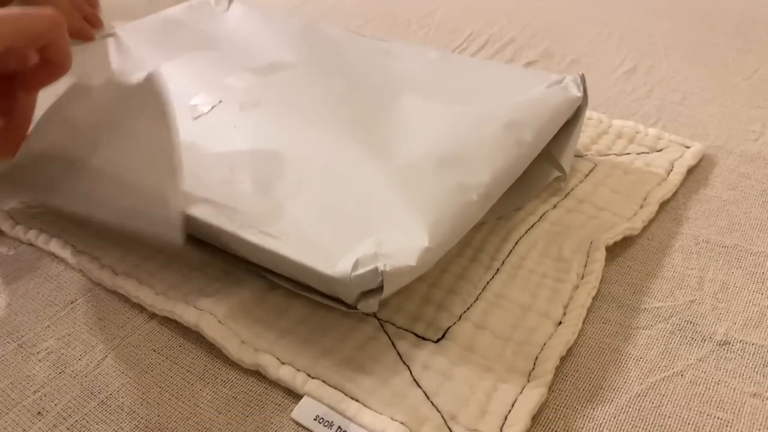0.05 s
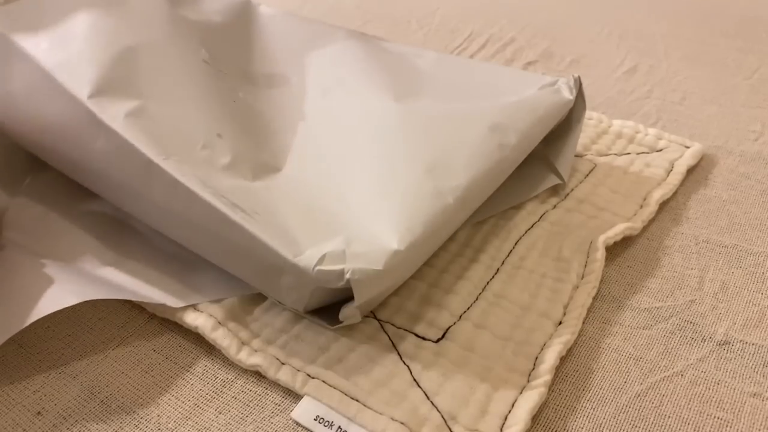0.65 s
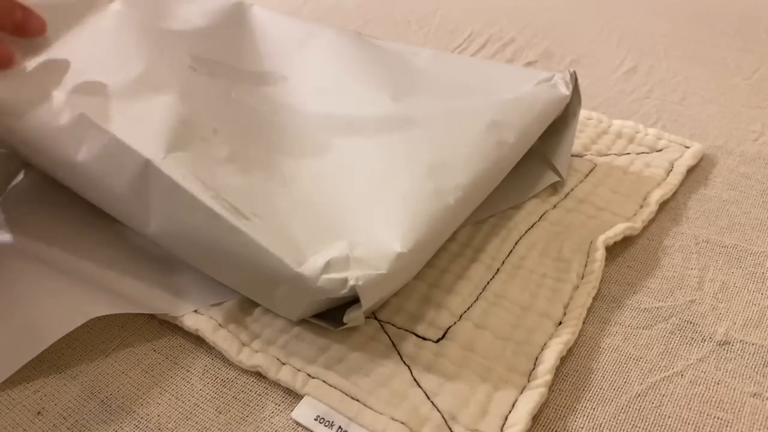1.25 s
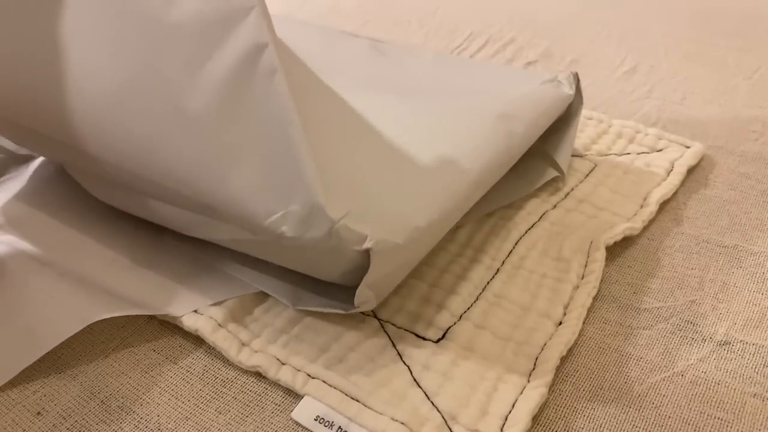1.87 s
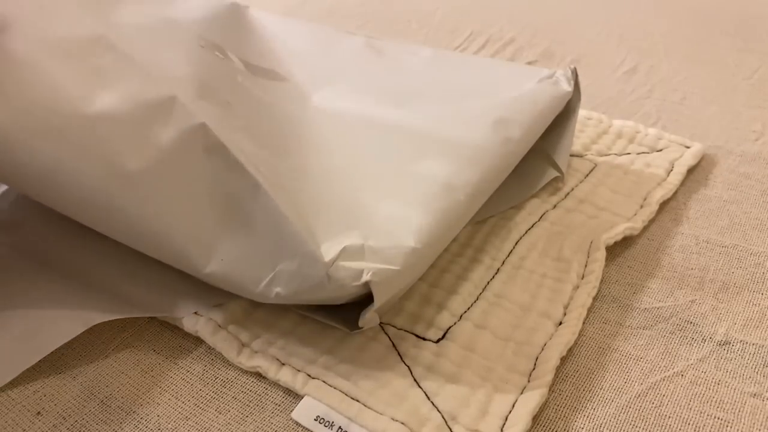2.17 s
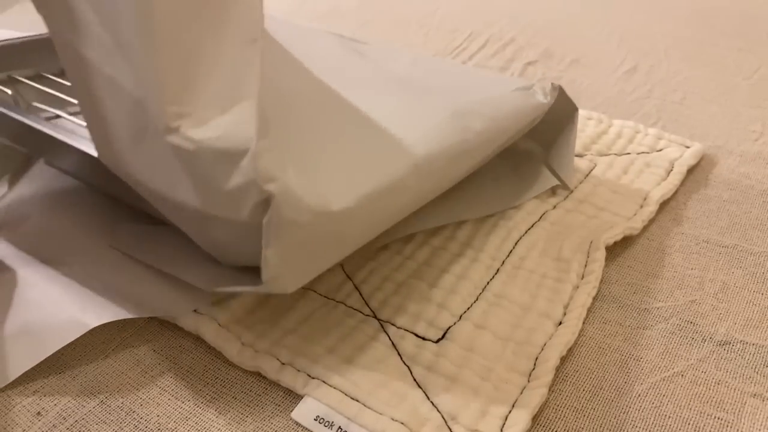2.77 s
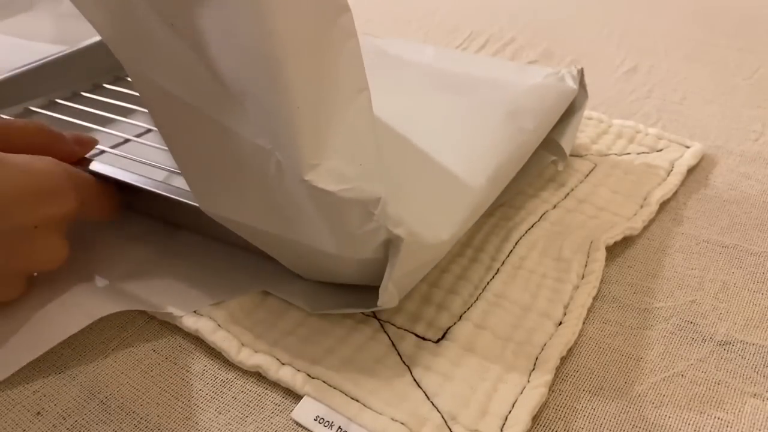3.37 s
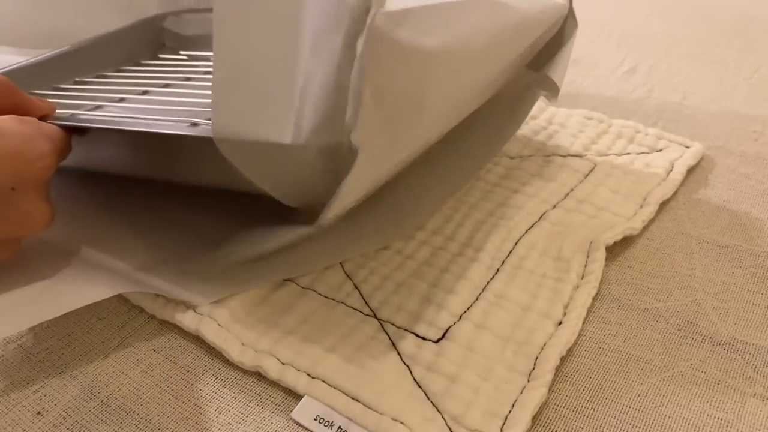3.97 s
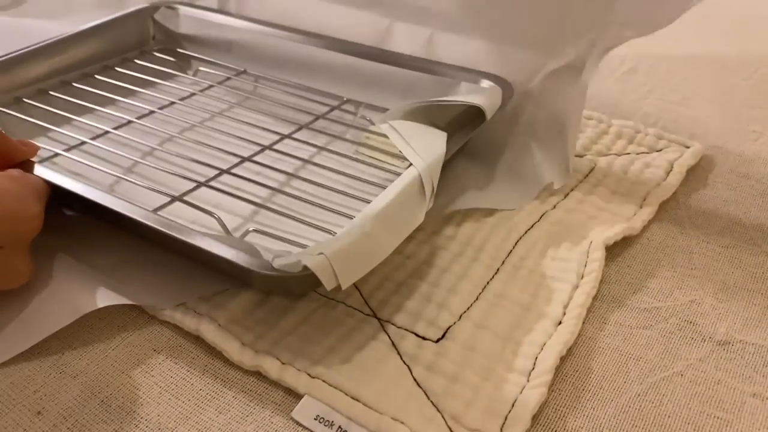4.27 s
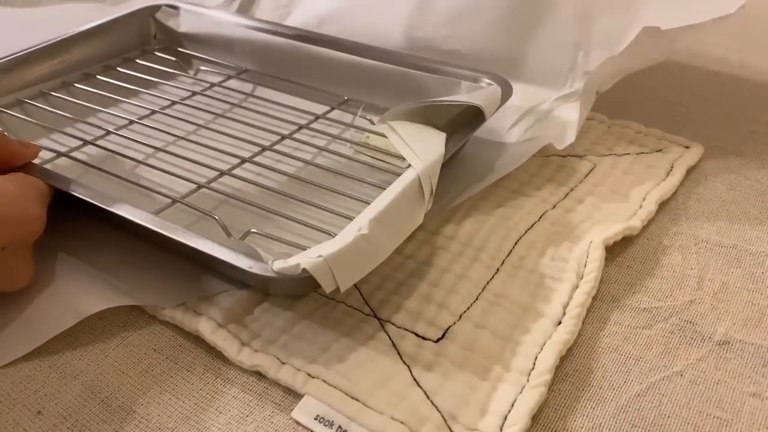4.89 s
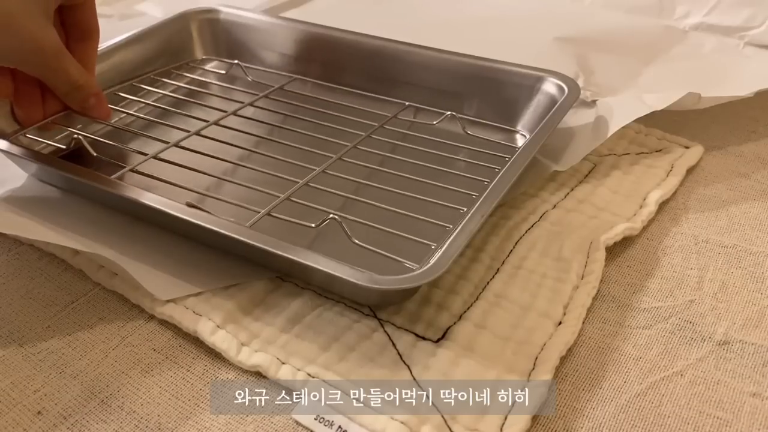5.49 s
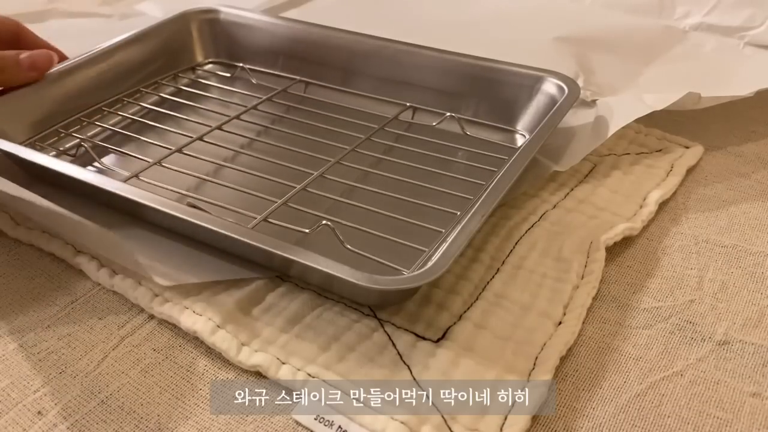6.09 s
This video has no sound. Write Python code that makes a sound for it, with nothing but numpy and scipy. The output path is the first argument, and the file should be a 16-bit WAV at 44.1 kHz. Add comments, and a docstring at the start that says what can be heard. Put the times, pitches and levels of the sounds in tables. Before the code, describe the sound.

From the start, hands pull stiff wrapping paper off a steel tray, close to the microphone in a small room with a faint low hum. The sheet slides and crackles in repeated pulls, full of sharp crease snaps and hollow pops as it buckles around the tray, busiest around 1.2 to 1.7 seconds. The tray bumps softly on a cloth-covered table at about 0.8, 1.4, 2.4 and 3.1 seconds. Near 4 seconds the rustle swells and the tray comes free with the hardest muffled thud. The paper crackles more loosely and settles by 5 seconds. From about 5.2 seconds a wire rack scrapes lightly in the tray, ticks once, and drops into place near 5.6 seconds with a short, bright, ringing clatter. One last small paper crackle comes just after 6 seconds.

```python
"""Over the low hum of a small room, close by, hands pull stiff wrapping paper off a steel tray.
Pull after pull the sheet slides and crackles, creases snap and panels buckle, hollow while the tray
is still inside. The tray bumps the cloth-covered table, hardest as it comes free at about 4 s.
The paper settles; the tray's wire rack slides and, near 5.6 s, drops into place with a short
ringing clatter. One last small crackle of paper follows."""
import sys
import numpy as np
from scipy import signal
from scipy.fft import rfft, irfft
from scipy.io import wavfile

SR = 44100
rng = np.random.default_rng(int(sys.argv[2]) if len(sys.argv) > 2 else 0)


def inscribe(sig):
    """Save sig as 16-bit PCM at rate SR to the path in sys.argv[1].

    A 1-D sig is mono; a 2-D sig holds one channel per row.
    Samples are clipped to [-1, 1] before scaling.
    """
    pcm = np.round(np.clip(np.atleast_2d(sig).T, -1, 1) * 32767)
    wavfile.write(sys.argv[1], SR, pcm.astype(np.int16))


N = 270774
T = np.arange(N) / SR


def undb(db):
    """Decibels to gain."""
    return 10 ** (np.asarray(db) / 20)


def unit(x):
    """Scale to rms 1."""
    return x / np.sqrt(np.mean(x ** 2))


def on_bins(points, size):
    """Read a (Hz, value) curve at the bins of a transform."""
    hz, value = np.transpose(points)
    return np.interp(np.log(np.arange(size // 2 + 1) * SR / size + 1), np.log(hz + 1), value)


def colour(x, points, size=4096):
    """Minimum-phase EQ along a (Hz, dB) curve, with unit power gain."""
    cepstrum = irfft(np.log(undb(on_bins(points, size))))
    causal = np.r_[1, np.full(size // 2 - 1, 2), np.zeros(size // 2)]
    response = irfft(np.exp(rfft(cepstrum * causal)))
    return signal.fftconvolve(x, response[None] / np.linalg.norm(response), axes=-1)[:, :N]


def add(track, s, sound):
    """Mix a short sound in at time s."""
    start = max(int(s * SR), 0)
    track[:, start:start + sound.shape[1]] += sound[:, :N - start]


def fade(t, t60):
    """Exponential decay, 60 dB down at t60."""
    return np.exp(-np.log(1000) * t / t60)


def walk(rate):
    """Random wander with a spread near 1, turning rate times a second."""
    return np.interp(T * rate, np.arange(N), rng.standard_normal(N))


def grains(rate, spread_db):
    """Two trains of tiny clicks; a positive spread makes a few stand out, a negative one sinks a few."""
    size = undb(spread_db * np.minimum(rng.exponential(size=(2, N)), 3.5))
    fires = rng.random((2, N)) < rate / SR
    return unit(fires * size * rng.choice([-1, 1], (2, N)))


# spectrum of the background bed: (frequency [Hz], level [dB])
HUM_EQ = [(15, -16), (25, -6), (75, 2.5), (100, -5), (122, 5), (160, -9), (373, -8), (709, -22),
          (1280, -20), (1910, -46.5), (2370, -23), (2780, -70.5), (3440, -68.5), (10000, -61),
          (13100, -60.5), (15000, -52.5)]

def room_tone():
    """A faint low hum of the house, gently wavering."""
    return colour(rng.standard_normal((2, N)), HUM_EQ) * undb(-55 + walk(rate=8.1))


# hand gestures: (start [s], length [s], opening level [dB], closing level [dB], extra slide [dB])
PULL_CUES = [(0.024, 0.25, -33.5, -60.5, 1.5), (0.275, 0.06, -49, -45, -12.5), (0.354, 0.22, -56, -39, 7.5),
             (0.683, 0.11, -46.5, -40.5, 3.5), (0.903, 0.14, -56, -45, -2.5),
             (1.19, .19, -45.5, -30.5, -2.5), (1.4, 0.17, -40, -44.5, 4), (1.539, 0.11, -38.5, -46.5, 7),
             (1.648, 0.021, -39, -36.5, 0), (1.745, 0.055, -60, -48.5, -3), (1.922, 0.25, -50, -44.5, 1),
             (2.215, 0.083, -47.5, -66, 5.5), (2.306, 0.028, -45.5, -37.5, 1),
             (2.385, 0.34, -43, -38.5, -0.5), (2.803, 0.21, -55.5, -46, 1), (3.048, .1, -51, -49, -0.5),
             (3.351, 0.24, -51, -66.5, -6.5), (3.466, 0.37, -47, -42.5, 2), (3.874, 0.13, -52.5, -33.5, 5),
             (3.969, 0.085, -34, -32, 1), (4.087, 0.279, -43, -39.5, -7.5), (4.4, 0.096, -40, -45.5, 2),
             (4.503, 0.35, -46, -64, -17), (4.88, .075, -44.5, -59, -3.5), (5.061, 0.024, -59.5, -64.5, -3),
             (6.066, 0.06, -51, -64.5, 5.5)]

def pulls(grip_db_per_s=1001, release_db_per_s=282, held_db=-64.5, let_go_s=4.95, waver_db=1.65):
    """Effort and slide envelopes in dB: each pull grips fast, swells or eases, and releases slower."""
    effort = slide = held_db - release_db_per_s * np.maximum(T - let_go_s, 0)  # the held sheet rubs
    depth_db = 60
    for s, length, first_db, last_db, slide_db in PULL_CUES:
        times = [s - depth_db / grip_db_per_s, s, s + length, s + length + depth_db / release_db_per_s]
        db = np.interp(T, times, [first_db - depth_db, first_db, last_db, last_db - depth_db])
        effort = np.maximum(effort, db)
        slide = np.maximum(slide, db + slide_db)
    return effort + waver_db * walk(rate=28), slide


# friction hiss, its airy top, crumpling folds, flapping panels, table rumble:
# (frequency [Hz], level [dB])
HISS_EQ = [(500, -18.5), (1200, -1), (2000, -8), (3500, 2.5), (5000, 1), (7000, -1.5), (9000, -1),
           (12000, -5), (16000, -14.5)]
SHEEN_EQ = [(3000, -29.5), (6000, -8.5), (9000, 0), (12000, -1.5), (16000, -10.5)]
CRUMPLE_EQ = [(400, -22.5), (1000, -4), (1500, 2), (2500, 5), (3500, -9.5), (6000, -40), (14000, -37.5)]
PANEL_EQ = [(120, -8.5), (280, -7.5), (500, -0.5), (750, 4), (1050, -1), (1280, 2), (1800, -12.5),
            (3500, -20), (8000, -32.5)]
RUMBLE_EQ = [(20, -22), (45, -3.5), (75, 3.5), (130, -0.5), (250, -2), (450, -7.5), (1200, -50.5)]

def sliding_sheet(effort_db, slide_db):
    """Paper fibres catch and slip, folds crumple, and coarser slips shake the panels and the table."""
    drive_db = effort_db + 42  # 0 at a moderate pull
    catching = walk(rate=170)  # the sheet advances in tiny jerks
    hiss = colour(grains(rate=9000, spread_db=4) * undb(slide_db - 1 + 2 * catching), HISS_EQ)
    sheen_db = -47 + 1.66 * (slide_db + 40.5)  # a faster slide is brighter
    sheen = colour(grains(rate=4400, spread_db=-4) * undb(sheen_db), SHEEN_EQ)
    fine_wrinkles = grains(rate=2500, spread_db=2) * undb(1.9 * catching)
    single_wrinkles = undb(-3) * grains(rate=220, spread_db=2)
    crumple = colour((fine_wrinkles + single_wrinkles) * undb(-51 + 1.01 * drive_db), CRUMPLE_EQ)
    flutter_db = -44.5 + 0.86 * drive_db + 1.4 * catching
    flutter = colour(grains(rate=900, spread_db=4) * undb(flutter_db), PANEL_EQ)
    rumble = colour(grains(rate=630, spread_db=3) * undb(-48.5 + 0.66 * drive_db), RUMBLE_EQ)
    return hiss + sheen + crumple + flutter + rumble


# how much of the tray the wrapping encloses: (time [s], share [0-1])
ENCLOSED = [(0, .5), (1.2, 1), (2.8, 1), (3.6, .3), (4.1, 0)]
# air resonances inside the wrapping: (frequency [Hz], bandwidth [Hz], level [dB])
CAVITY_MODES = [(710, 150, -5.5), (960, 68, -3), (1350, 110, -10.5)]

def hollow_packet(paper):
    """The air between wrapping and tray gives the rustle a hollow ring until the tray is out."""
    trapped = paper * np.interp(T, *np.transpose(ENCLOSED))
    return paper + sum(undb(db - 5) * signal.lfilter(*signal.iirpeak(hz, hz / width, fs=SR), trapped)
                       for hz, width, db in CAVITY_MODES)


def small_snaps(effort_db, per_s=22, above_pull_db=3.5, scatter_db=10, taut_hz=5000, loose_hz=2600):
    """Cues (s, dB, Hz) for chance creases: they ride the pull and dull as the paper hangs loose."""
    jitter, strength, pitch = rng.random((400, 3)).T
    s = (np.arange(len(jitter)) + jitter) / per_s
    db = np.interp(s, T, effort_db) + above_pull_db + scatter_db * (2 * strength - 1)
    tautness = np.interp(s, *np.transpose(ENCLOSED))
    hz = (loose_hz + (taut_hz - loose_hz) * tautness) * 2 ** (pitch - .5)
    return list(np.transpose([s, db, hz])[s < T[-1]])


# featured crease snaps: (time [s], level [dB], band centre [Hz])
SNAP_CUES = [(0.0295, -14.5, 7400), (0.0385, -30, 4660), (0.0674, -18, 7000), (0.0723, -22, 5000),
             (0.1611, -20.5, 6640), (0.3234, -27, 4920), (0.3726, -18, 5740), (0.5343, -28.5, 3340),
             (0.5819, -20.5, 5600), (0.5939, -16.5, 5270), (0.6064, -28, 4800), (0.7858, -13.5, 5700),
             (0.9117, -33.5, 5870), (0.9279, -34, 5170), (0.9677, -23, 6960), (1.036, -24.5, 6150),
             (1.0495, -30, 6000), (1.0589, -27.5, 4140), (1.1857, -38.5, 3300), (1.2441, -18.5, 5760),
             (1.3184, -16.5, 6240), (1.3595, -13.5, 7130), (1.3678, -13, 7550), (1.4378, -14, 6000),
             (1.4451, -28, 5400), (1.5955, -12.5, 5900), (1.6521, -20.5, 6000), (1.6788, -47, 3830),
             (1.6909, -21, 5200), (1.775, -31, 6400), (2.0, -28, 3800), (2.0805, -44, 1700),
             (2.1187, -20, 6100), (2.2662, -43.5, 2070), (2.4332, -25.5, 4270), (2.4403, -14, 7500),
             (2.5842, -22, 6900), (2.6793, -22.5, 7150), (2.7305, -18.5, 7350), (2.9305, -27, 5930),
             (2.9946, -23, 5900), (3.1428, -34, 3160), (3.1532, -26.5, 5170), (3.3512, -45.5, 2300),
             (3.557, -29, 1620), (3.6395, -25.5, 4200), (3.7842, -20.5, 7860), (3.9806, -22.5, 4400),
             (4.0195, -19, 3600), (4.0946, -24, 3570), (4.1862, -25.5, 4750), (4.2099, -30, 4230),
             (4.2724, -35, 2944), (4.28, -28.5, 6040), (4.3237, -29, 3600), (4.3911, -23, 3580),
             (4.4034, -26, 5000), (4.4173, -35, 5000), (4.5369, -32, 3770), (4.5974, -35, 2600),
             (4.7228, -40.5, 2700), (4.761, -44.5, 2070), (4.8735, -36, 3100), (5.062, -44, 1996),
             (5.082, -57, 2950), (6.0625, -35.5, 3960), (6.073, -37, 4800)]

def creases(small_cues, rise_s=0.00081, flip_s=0.0012, trail_t60=0.041, q=0.63):
    """A crease flips in a millisecond or two, trails off in finer cracks and nudges its panel."""
    snaps, nudges = np.zeros((2, N)), np.zeros((2, N))
    t = np.arange(-256, 2048) / SR  # the snap peaks at t = 0
    edge_ratio = 1 + .5 / q
    for s, db, hz in list(SNAP_CUES) + small_cues:
        slow = (6000 / hz) ** 0.38  # a slack, dull fold flips more slowly than a taut one
        flip = np.exp(-(t / np.where(t < 0, rise_s, flip_s * slow)) ** 2)
        trail = undb(-16) * (t > 0) * fade(abs(t), trail_t60 * slow)
        burst = rng.standard_normal((2, len(t))) * (flip + trail)
        band_hz = [hz / edge_ratio, min(hz * edge_ratio, SR * .45)]
        snap = signal.lfilter(*signal.butter(2, band_hz, "band", fs=SR), burst)
        snap /= np.linalg.norm(snap, axis=1, keepdims=True)
        add(snaps, s + t[0], undb(db + 19.5) * np.sqrt(slow) * snap)
        add(nudges, s + t[0], undb(db - 9) * burst)
    snap_eq = [(300, 9.5), (1500, 10.5), (3500, 2), (6500, -2.5), (9500, 1), (16000, -0.5)]
    return colour(snaps, snap_eq) + colour(nudges, PANEL_EQ)


# whole panels giving way: (time [s], pop level [dB], pop pitch [Hz], crackle level [dB])
BUCKLE_CUES = [(0.036, -18.5, 670, -17.5), (0.071, -20, 605, -26), (0.135, -25, 480, -34),
               (0.579, -18.5, 716, -15), (0.596, -21, 755, -24), (0.786, -20, 624, -21.5),
               (0.798, -20, 610, -38.5), (0.914, -29.5, 560, -42.5), (1.036, -30, 690, -31),
               (1.057, -23, 794, -28.5), (1.243, -27.5, 1220, -38.5), (1.366, -20.5, 730, -22),
               (1.441, -21, 923, -39), (1.595, -22.5, 1220, -41.5), (1.677, -18.5, 890, -17.5),
               (1.69, -25.5, 590, -38), (1.937, -32.5, 736, -54), (2.079, -28.5, 727, -48),
               (2.135, -23.5, 970, -24.5), (2.436, -21.5, 400, -22), (2.484, -25, 680, -27.5),
               (2.659, -22.5, 668, -29), (2.729, -23.5, 670, -32), (3.018, -27.5, 350, -53),
               (3.141, -31, 340, -48), (3.555, -22.5, 693, -47), (3.638, -25.5, 500, -29),
               (3.786, -21.5, 490, -28), (4.009, -27.5, 680, -44), (4.092, -16.5, 597, -25),
               (4.873, -46, 727, -51), (6.047, -42.5, 960, -37)]

def buckling(pop_t60=0.049, crackle_t60=0.038, rise_s=0.0027, q=1.8):
    """A panel gives way: a hollow pop pitched by its size and a quick avalanche of small cracks."""
    pops, crackle_envelope = np.zeros((2, N)), np.zeros((1, N))
    t = np.arange(SR // 4)[None] / SR
    attack = np.minimum(t / rise_s, 1)
    for s, pop_db, hz, crackle_db in BUCKLE_CUES:
        hollow = signal.lfilter(*signal.iirpeak(hz, q, fs=SR), rng.standard_normal((2, t.size)))
        add(pops, s, undb(pop_db - 3) * unit(hollow) * attack * fade(t, pop_t60))
        add(crackle_envelope, s, undb(crackle_db) * attack * fade(t, crackle_t60))
    return pops + undb(2.5) * colour(crackle_envelope * grains(rate=4500, spread_db=-6.5), HISS_EQ)


def shivering(effort_db, below_pop_db=12, settle_db_per_s=263):
    """Each buckle shakes the whole sheet: the effort envelope kicks up, then settles."""
    shaken_db = effort_db.copy()
    for s, pop_db, _, _ in BUCKLE_CUES:
        after = slice(int(s * SR), int(s * SR) + SR // 2)
        shiver_db = pop_db - below_pop_db - settle_db_per_s * (T[after] - s)
        shaken_db[after] = np.maximum(shaken_db[after], shiver_db)
    return shaken_db


# thuds of the tray on the padded table: (time [s], level [dB], pitch [Hz])
BUMP_CUES = [(0.039, -39, 114), (0.799, -33, 119.2), (1.372, -26, 115), (2.434, -30, 186),
             (3.142, -33.5, 332), (3.148, -38, 158), (4.012, -31, 112), (4.025, -31.5, 62),
             (4.096, -29, 210), (4.1, -20, 122), (4.1156, -22.5, 124)]

def tray_bumps(t60=0.047, rise_s=0.0022):
    """The cloth softens each bump to a few low cycles of the table top."""
    thuds = np.zeros((2, N))
    t = np.arange(SR // 3)[None] / SR
    envelope = (1 - np.exp(-t / rise_s)) * fade(t, t60)
    for s, db, hz in BUMP_CUES:
        add(thuds, s, undb(db + 8) * np.sin(2 * np.pi * hz * t) * envelope)
    return thuds


# the rack's scrape before and after the drop: (time [s], level [dB])
SCRAPE_ENVELOPE = [(5.1, -68), (5.22, -51), (5.45, -52), (5.53, -54), (5.62, -39.5), (5.65, -33.5),
                   (5.7, -56.5), (6.03, -52.5)]
# hits of the rack on the tray: (time [s], level [dB], time to fall 30 dB [s])
CLINK_CUES = [(5.447, -18, 0.0081), (5.64, -9.5, 0.027), (5.651, -1.5, 0.038), (5.668, -4, 0.033),
              (5.707, -14, 0.072)]
# bright ring of the rack's frame: (frequency [Hz], level [dB], t60 [s])
FRAME_MODES = [(2000, -8, 0.22), (2575, -1.5, .18), (2895, -4, 0.18), (3084, -6, 0.206), (3170, -0.5, 0.23),
               (3840, -10.5, 0.39), (4735, 2, 0.1), (5120, 4, 0.203), (5340, -1, 0.19), (6315, -10, 0.4),
               (7140, -14, 0.14), (8850, 5, .16), (9800, -9, .16), (9959, -16, .2), (11100, -13, .12)]
# long ring of the tray's rim: (frequency [Hz], level [dB])
RIM_MODES = [(974, -1), (1136, -12), (1195, -5), (1297, 0), (1486, -14), (1680, -11.5), (2218, -4),
             (3246, -13), (3962, -13), (4215, -2), (5970, -10)]

def wire_rack(tray_t60=0.91, wires_t60=0.15):
    """Steel chatters on steel, ringing the rack's frame, a haze of wire modes and the tray."""
    t = np.arange(SR) / SR

    def ring(hz, t60):
        return np.sin(2 * np.pi * (hz * t + rng.random())) * fade(t, t60)

    def excite(push, body):
        return signal.fftconvolve(push, body[None] / np.sqrt(SR), axes=-1)[:, :N]

    force = undb(np.interp(T, *np.transpose(SCRAPE_ENVELOPE), left=-120, right=-120))
    soft_contact_eq = [(500, 3), (1400, -0.5), (3000, -8.5), (5000, -13), (12000, -16.5)]
    scrape = colour(force * grains(rate=130, spread_db=3), soft_contact_eq)
    blows = np.zeros((1, N))
    for s, db, length in CLINK_CUES:
        add(blows, s, undb(db) * fade(t, 2 * length)[None])
    chatter = blows * grains(rate=5000, spread_db=-2)
    frame = unit(sum(undb(db) * ring(hz, t60) for hz, db, t60 in FRAME_MODES))
    wires = unit(sum(ring(450 + 15000 * place ** 1.3, wires_t60 * undb(3.9 * (sustain - 1.5)))
                     for place, sustain in rng.random((320, 2))))
    rim = unit(sum(undb(db) * ring(hz, tray_t60) for hz, db in RIM_MODES))
    tray_bottom = unit(sum(ring(hz, tray_t60) for hz in rng.triangular(900, 1250, 1900, size=40)))
    rack_ring = undb(-1) * excite(chatter + undb(6) * scrape, wires + frame / 2)
    tray_ring = excite(undb(-20.5) * chatter + undb(-8) * scrape, tray_bottom + rim / 2)
    steel_eq = [(150, 4.5), (400, -5.5), (600, -3.5), (850, -0.5), (1300, 3.5), (2000, 1), (3000, 4),
                (5000, -1.5), (7000, 1.5), (10000, 3), (16000, -12)]
    return undb(-20.5) * colour(rack_ring + tray_ring + undb(-11) * chatter, steel_eq)


# stereo width: (frequency [Hz], side minus mid [dB])
WIDTH_CURVE = [(100, -19.5), (300, -28), (800, 2), (2500, 0.5), (6000, -5), (9000, -11.5)]

def widen(pair):
    """Two unrelated signals become mid and side of an image that is widest in the midrange."""
    side_gain = undb(on_bins(WIDTH_CURVE, N))
    gains = np.array([np.ones_like(side_gain), side_gain]) / np.sqrt(1 + side_gain ** 2)
    mid, side = irfft(rfft(pair) * gains, N)
    return np.array([mid + side, mid - side])


def room(x, t60=0.25, wet_db=-12, predelay_s=0.0022):
    """Table and walls return a short tail, duller than the direct sound."""
    t = np.arange(SR // 2) / SR
    tail = rng.standard_normal((2, len(t))) * fade(t, t60) * (t > predelay_s)
    tail /= np.linalg.norm(tail, axis=1, keepdims=True)
    wet = signal.fftconvolve(x, tail, axes=-1)[:, :N]
    return x + undb(wet_db) * colour(wet, [(100, 5), (700, 5.5), (3000, 6.5), (7000, 1.5), (15000, -5.5)])


def scene():
    """Wide paper and rack and centred thuds in the room, over the hum."""
    effort_db, slide_db = pulls()
    rustle = sliding_sheet(shivering(effort_db), slide_db)
    paper = hollow_packet(rustle + creases(small_snaps(effort_db)) + buckling())
    foley = widen(paper + wire_rack()) + tray_bumps()
    return room(foley) + widen(room_tone())


# level between the two microphone ports: (frequency [Hz], left minus right [dB])
MIC_BALANCE = [(100, 2.5), (380, 3), (760, 6), (1250, 4.5), (2200, 3.5), (3500, 7.5), (5300, 5), (6700, 4),
               (8200, 0.5), (15000, -0.5)]
# phase between them: (frequency [Hz], left lead [rad])
MIC_PHASE = [(150, 0), (780, 1.3), (1120, .7), (1720, 1.5), (5400, .3), (6800, -.6), (8200, -3.1),
             (10800, -6.3), (13600, -9.4), (16000, -12.4)]

def record(dry, low_cut_hz=32, high_cut_hz=16000):
    """The microphone ports differ in level and arrival time; the deepest bass and the top are cut."""
    log_ratio = np.log(undb(on_bins(MIC_BALANCE, 2 * N))) + 1j * on_bins(MIC_PHASE, 2 * N)
    port_gains = np.exp(np.array([log_ratio, -log_ratio]) / 2)
    ports = irfft(rfft(dry, 2 * N) * port_gains)[:, :N]
    low_cut = signal.butter(4, low_cut_hz, "high", fs=SR, output="sos")
    high_cut = signal.ellip(10, .2, 70, high_cut_hz, fs=SR, output="sos")
    return signal.sosfilt(high_cut, signal.sosfilt(low_cut, ports))


dry = scene()
out = record(dry)
inscribe(out)
```